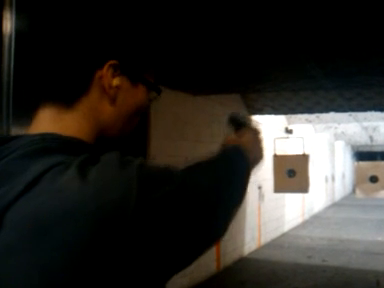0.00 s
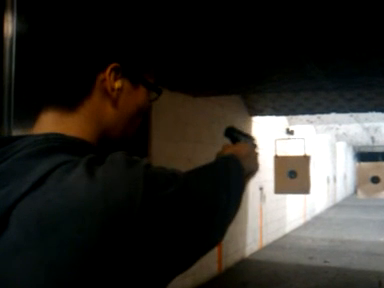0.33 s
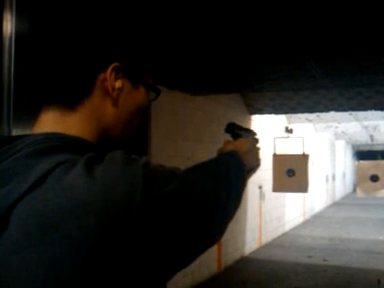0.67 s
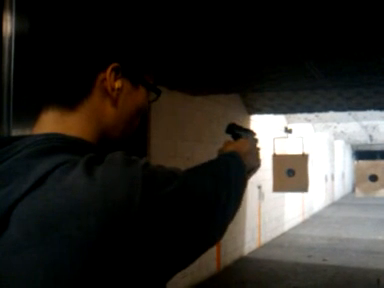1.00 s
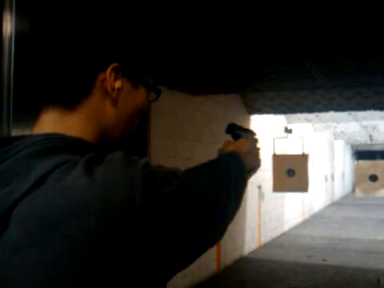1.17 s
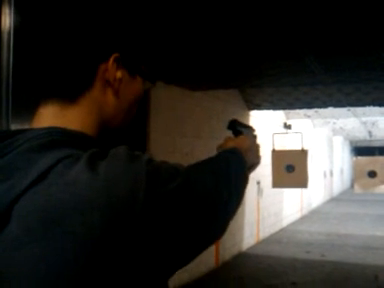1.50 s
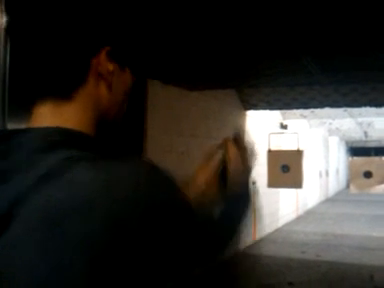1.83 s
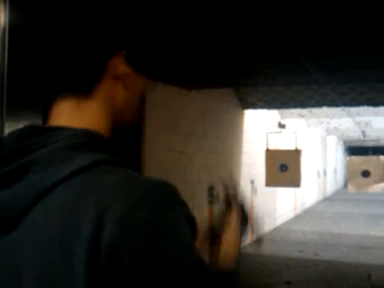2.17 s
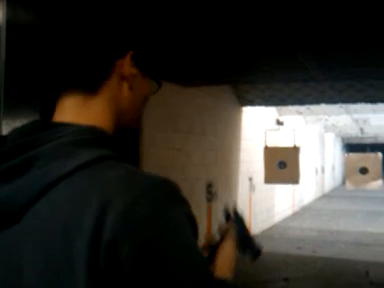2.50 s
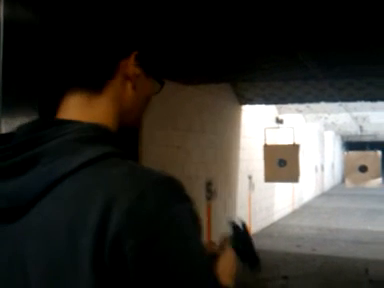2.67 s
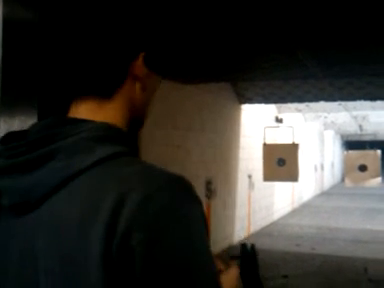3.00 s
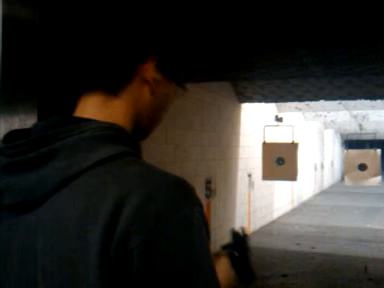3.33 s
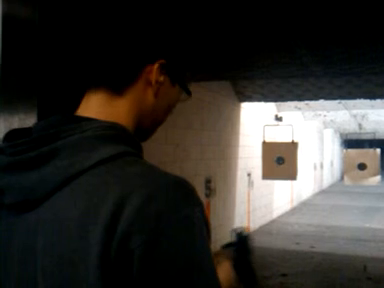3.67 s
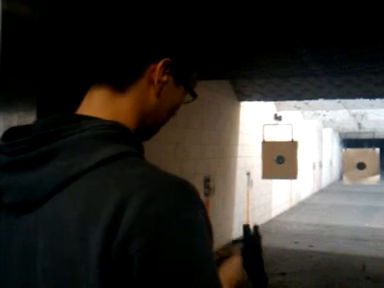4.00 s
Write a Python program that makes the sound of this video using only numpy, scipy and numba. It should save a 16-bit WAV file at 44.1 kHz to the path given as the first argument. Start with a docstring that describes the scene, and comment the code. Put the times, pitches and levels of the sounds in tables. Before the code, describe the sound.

Two loud pistol shots boom and echo in an indoor range, with metal clanging after each.

```python
"""Pistol shots in a concrete indoor range

One shot is still dying away and two more follow close by. Each blast thumps, booms in the booth and
excites a long reverberant roar; a moment later the steel bullet trap clangs from the far end and rings
in its modes. Small clacks and a spent case sound over the ventilation rumble. A small narrow-band
recorder compresses each blast with its gain control and overloads on the peaks."""
import sys
import numpy as np
from scipy import signal
from scipy.fft import rfft, irfft
from scipy.io import wavfile
from numba import njit

SR = 44100
rng = np.random.default_rng(int(sys.argv[2]) if len(sys.argv) > 2 else 0)


def store_wav(level_fs):
    """Save 16-bit WAV to argv[1]."""
    pcm = np.round(np.clip(np.atleast_2d(level_fs), -1, 1) * 32767)
    wavfile.write(sys.argv[1], SR, pcm.T.astype(np.int16))


N = 176400

# Shots and the relative levels of their parts: start_s, level_db, lead_in_s, lead_in_db,
# thump_db, boom_db, tail_db, clang_db, ring_db, ring_pitch_ratio
SHOTS = [(-.56, -1, .005, -15, -0.5, -12, -0.24, -4, -7.5, .96),
         (2.0019, -3, 0.0041, -30.5, 2, 0, -0.5, -2, -2.5, 0.99),
         (3.428, -8, 0.0097, -21, -6.5, -2, 13.5, -2.5, -2.5, 0.34)]
def shot(start, level_db, lead_s, lead_db, thump_db, boom_db, tail_db, clang_db, ring_db, ring_pitch):
    """Propagation delay: the trap answers the blast after the bullet's flight and the sound's return."""
    rise_s, round_trip_s = .004, .195
    age = since(start)
    lead_in = undb(lead_db) * (age > 0)
    attack = np.maximum(lead_in, np.clip((age - lead_s) / rise_s, 0, 1) ** 2)
    blast = hall_roar(age, tail_db) + muzzle_thump(age, thump_db) + booth_boom(age, boom_db)
    trap = bullet_trap(since(start + round_trip_s), clang_db, ring_db, ring_pitch)
    return undb(level_db) * (attack * blast + trap)


# Reverberation of the hall by band: centre_hz, near_db, near_t60_s, far_db, far_t60_s
HALL = [(35.6, -37, 1.3, -49, 2), (83, -21.5, 1.31, -50, 2), (160, -13, 1.2, -45, 2.4),
        (295, -9, 1.094, -27.5, 2.6), (417, 0, 1.258, -24.5, 2.5), (810, 5, 1.267, -17, 3.18),
        (1101, -0.5, 1.496, -19, 3.03), (1566, -3, 1.34, -23.5, 3.1), (1806, -1.5, 1.313, -31.5, 3.55),
        (2660, -1.5, 1.41, -26.5, 2.86), (3580, 1.5, 1.055, -26.5, 2.65), (4130, -9, 1.7, -33, 2)]
def hall_roar(age, tail_db):
    """Double-slope reverberation: a fast near decay and a slow far tail add in power in each band."""
    log_centres = np.log([row[0] for row in HALL])
    roar = 0
    for band, (_, near_db, near_t60, far_db, far_t60) in zip(np.eye(len(HALL)), HALL):
        power_share = np.interp(np.log(freqs()), log_centres, band)
        echoes = noise(np.sqrt(power_share) * (freqs() < SR / 8))
        near = undb(near_db) * fade(age, near_t60)
        far = undb(far_db + tail_db) * fade(age, far_t60)
        roar = roar + echoes * np.hypot(near, far)
    flutter_db = 1.42 * wander(rate_hz=41)  # the echoes arrive unevenly
    return roar * undb(flutter_db)


# Spectrum of the muzzle blast: frequency_hz, density_db
THUMP = [(20, -21.5), (60, -4), (100, -3), (145, 7), (220, -5.5), (500, -21.5)]
def muzzle_thump(age, level_db):
    """A pressure transient: the muzzle blast is a short swell of low-frequency noise."""
    return undb(level_db - 6) * swell(age, peak_s=.033) * band_noise(THUMP)


# Spectrum of the booth's response: frequency_hz, density_db
BOOM = [(60, -21), (140, -7), (210, -9), (330, 2), (560, -2), (850, -0.5), (1100, -5), (1500, -21.5),
        (4000, -38)]
def booth_boom(age, level_db):
    """Enclosure resonance: sound builds up in the booth, then dies away."""
    return undb(level_db + 6) * swell(age, peak_s=.074) * band_noise(BOOM)


# Spectrum of the bullet's impact: frequency_hz, density_db
CLANG = [(400, -17), (900, -2), (1400, -2), (2000, -16), (3000, -4.5), (4400, -12)]
# Mode clusters of the steel plates: pitch_hz, width_hz, level_db, t60_s
STEEL_MODES = [(466, 60, -23, 2.6), (729.4, 57, -17.5, 3.46), (850, 42, -32, 5.5), (1137, 50, -29.5, 3.5),
               (1470, 88, -22.5, 3.1), (1812, 70, -26, 2.7), (2660, 100, -29, 2.5)]
def bullet_trap(age, clang_db, ring_db, pitch_ratio):
    """Impact excitation: struck plates give a broadband clang, then ring on in wavering modes."""
    strike = 1 + undb(6) * np.exp(-age / .012)  # the sharp first instant
    clang = undb(clang_db + .5) * strike * fade(age, t60=.76) * band_noise(CLANG)
    ring = 0
    for hz, width, db, t60 in STEEL_MODES:
        waver_db = 3 * wander(rate_hz=8.9)
        ring = ring + undb(db + ring_db + waver_db) * fade(age, t60) * cluster(hz * pitch_ratio, width)
    return (age > 0) * (clang + ring)


# Small metallic impacts: start_s, level_db, decay_s
CLACKS = [(0.28, -28.5, .035), (.622, -39.5, .007), (.726, -51, 0.017), (1.283, -40, 0.056),
          (2.547, -16.5, 0.0036), (2.890, -31, .025)]
# Their shared spectrum: frequency_hz, density_db
CLACK_SPECTRUM = [(300, -14), (1000, 8.5), (1600, -5.5), (2400, -0.5), (3200, 1), (4400, -1.5)]
def clacks():
    """Impulsive excitation: brief knocks decay quickly as bright noise."""
    return sum(knock(*row) for row in CLACKS) * band_noise(CLACK_SPECTRUM)


# Bounces of the case: start_s, level_db
BOUNCES = [(1.50, -62), (1.715, -59), (1.745, -65.5)]
# Mode clusters of the case: pitch_hz, width_hz, level_db
CASE_MODES = [(3160, 160, 2), (3400, 150, -7)]
def spent_case():
    """Damped free vibration: a brass case pings faintly at each bounce on concrete."""
    envelope = sum(knock(start, db, decay_s=.041) for start, db in BOUNCES)
    return envelope * sum(undb(db) * cluster(hz, width) for hz, width, db in CASE_MODES)


# Spectrum of the air's rumble: frequency_hz, density_db
RUMBLE = [(20, -38.5), (40, -24.5), (65, -5.5), (130, -4), (190, -5.5), (300, -6), (520, -9), (800, -6),
          (1500, -17), (3400, -20.5), (4500, -22.5)]
# Duct tones: pitch_hz, width_hz, level_db
DUCT_TONES = [(129.3, 12, -59.5), (350, 14, -62), (728, 32, -57.5), (774, 19, -56.5)]
def ventilation():
    """Flow noise: air rumbles through ducts whose resonances add a few wavering tones."""
    rumble = undb(-50.5) * band_noise(RUMBLE)
    return rumble + sum(undb(db) * cluster(hz, width) for hz, width, db in DUCT_TONES)


def undb(db):
    """Amplitude ratio of a level in decibels."""
    return 10 ** (np.asarray(db) / 20)


def freqs():
    """Frequency of each spectral bin, at least 1 Hz."""
    return np.maximum(np.arange(N // 2 + 1) * SR / N, 1)


def noise(gain):
    """Spectral shaping: white noise weighted bin by bin, then scaled to rms 1."""
    x = irfft(rfft(rng.standard_normal(N)) * gain, N)
    return x / np.sqrt(np.mean(x ** 2) + 1e-20)


def band_noise(points):
    """Band-limited noise of rms 1 that follows a (Hz, dB) curve up to its last point."""
    hz, db = np.array(points, float).T
    return noise(undb(np.interp(np.log(freqs()), np.log(hz), db)) * (freqs() < hz[-1]))


def cluster(hz, width_hz):
    """Beating: closely spaced modes merge into narrow-band noise."""
    return noise(1 / (1 + ((freqs() - hz) / width_hz * 2) ** 2))


def wander(rate_hz):
    """Random modulation: low-passed noise of rms 1."""
    return noise(1 / (1 + (freqs() / rate_hz) ** 4))


def since(start):
    """Seconds since an event, zero before it."""
    return np.maximum(np.arange(N) / SR - start, 0)


def fade(age, t60):
    """Exponential decay of 60 dB in t60 seconds."""
    return np.exp(-np.log(1000) * age / t60)


def swell(age, peak_s):
    """Build-up and decay: an envelope that reaches 1 at peak_s."""
    return (age / peak_s * np.exp(1 - age / peak_s)) ** 2


def knock(start, db, decay_s):
    """Impact envelope: a sudden onset and exponential decay."""
    age = since(start)
    return undb(db) * (age > 0) * np.exp(-age / decay_s)


def scene():
    """Superposition: all sources add at one microphone."""
    return (sum(shot(*row) for row in SHOTS) + clacks() + spent_case() + ventilation())[None]


@njit
def follow(power, attack_s, release_s):
    """Envelope detection: a one-pole average with separate rise and fall times."""
    envelope, held = np.empty(len(power)), power[:400].mean()
    for i in range(len(power)):
        held += (power[i] - held) / (SR * (attack_s if power[i] > held else release_s))
        envelope[i] = held
    return envelope


def gain_control(x):
    """Look-ahead compression: the gain falls just before the level passes a threshold."""
    threshold_db, ratio, look_ahead_s = -10, 9.95, .00092
    level = np.sqrt(follow(x ** 2, attack_s=.00071, release_s=.014) / 2)
    coming_level = np.interp(np.arange(N) + look_ahead_s * SR, np.arange(N), level)
    return x * np.maximum(coming_level / undb(threshold_db), 1) ** (1 / ratio - 1)


def colour(x, points):
    """Zero-phase filtering by a (Hz, dB) curve."""
    hz, db = np.array(points, float).T
    bin_hz = np.maximum(np.arange(N + 1) * SR / (2 * N), 1)
    gain = undb(np.interp(np.log(bin_hz), np.log(hz), db))
    return irfft(rfft(x, 2 * N) * gain)[:N]


# Frequency response of the recorder: frequency_hz, gain_db
VOICE_BAND = [(20, 2.5), (3350, -1.5), (3700, -9.5), (4000, -16), (4300, -23.5), (4550, -34.5), (4900, -69),
              (5400, -100)]
def record(dry):
    """Nonlinear distortion: compressed sound saturates, narrows to a voice band and clips."""
    overload, ceiling = .93, .725
    saturated = overload * np.tanh(gain_control(dry[0]) / overload)
    narrowed = colour(saturated, VOICE_BAND) * undb(2)
    low_pass = signal.ellip(8, .2, 70, 15900, fs=SR, output="sos")
    return signal.sosfilt(low_pass, np.clip(narrowed, -ceiling, ceiling))[None]


dry = scene()
out = record(dry)
store_wav(out)
```